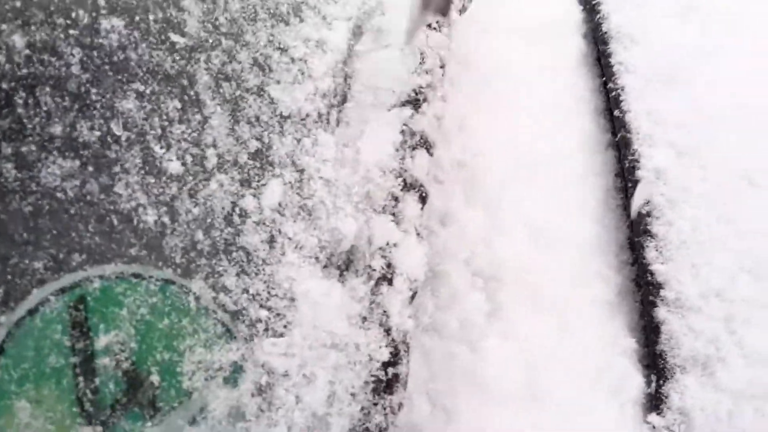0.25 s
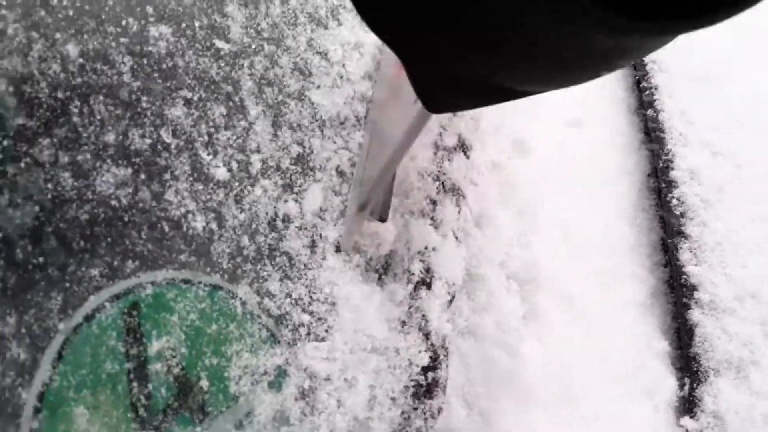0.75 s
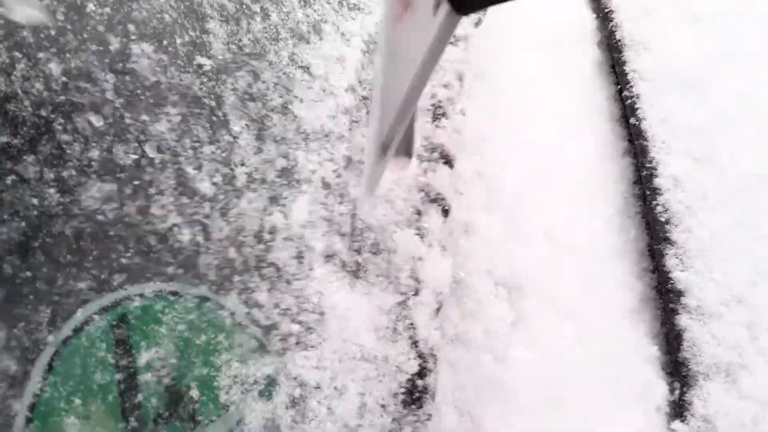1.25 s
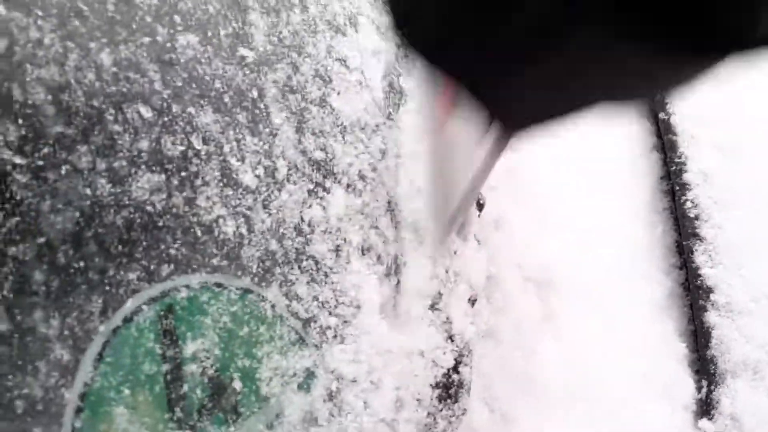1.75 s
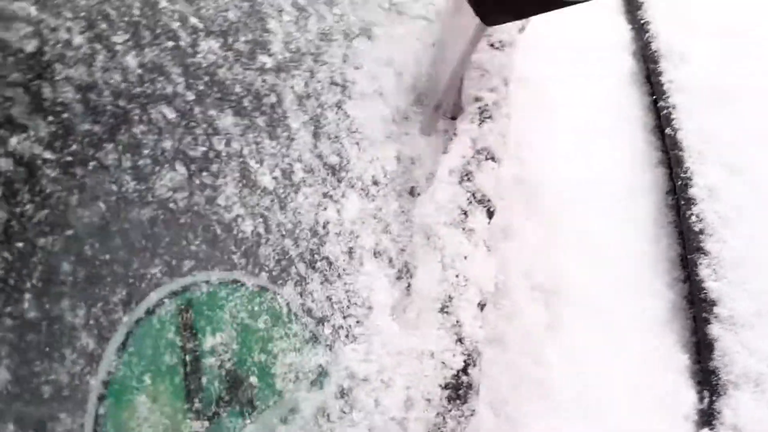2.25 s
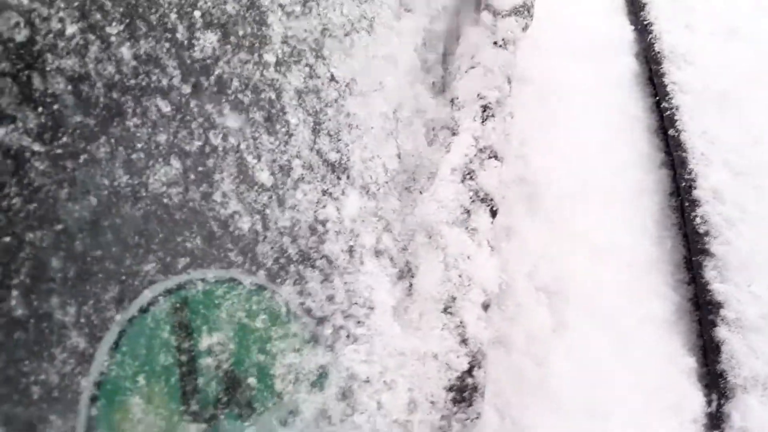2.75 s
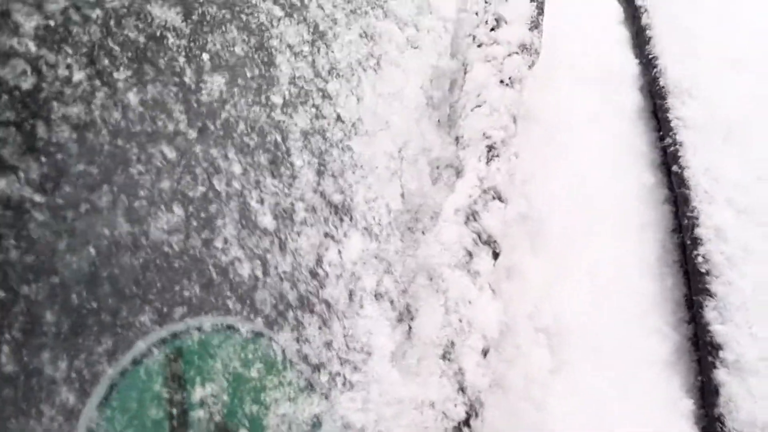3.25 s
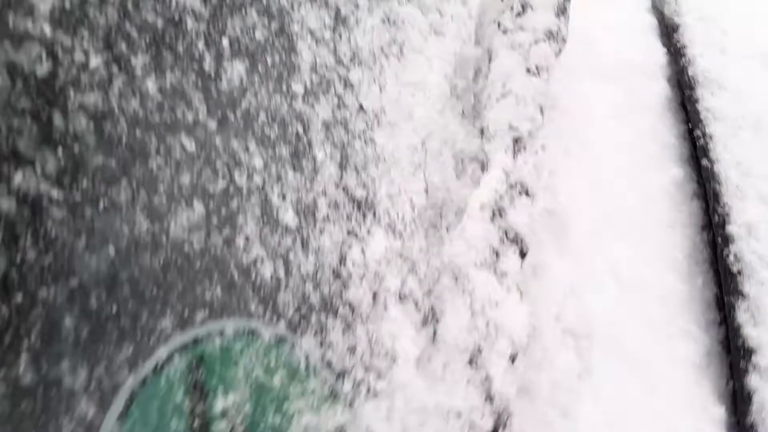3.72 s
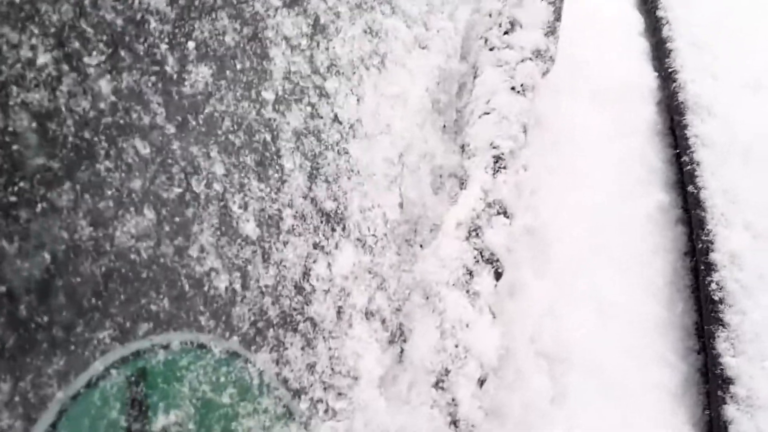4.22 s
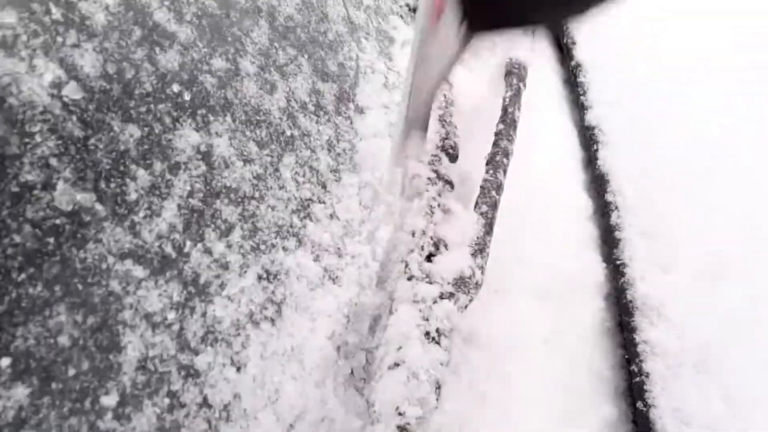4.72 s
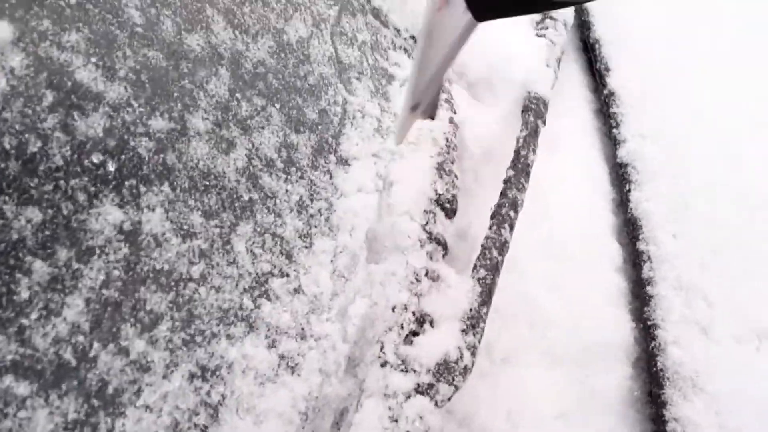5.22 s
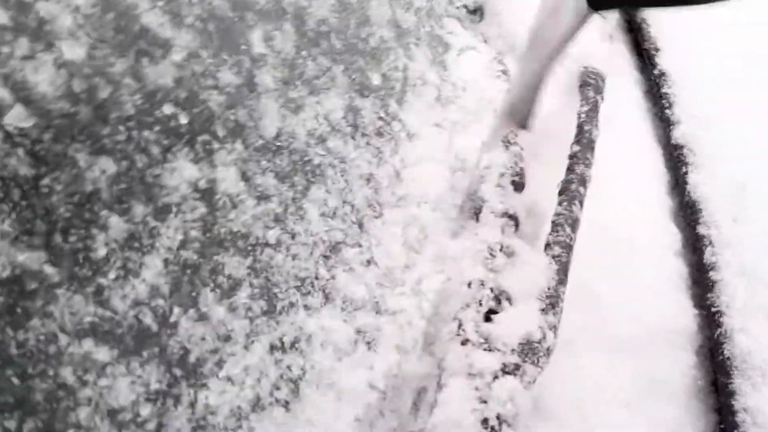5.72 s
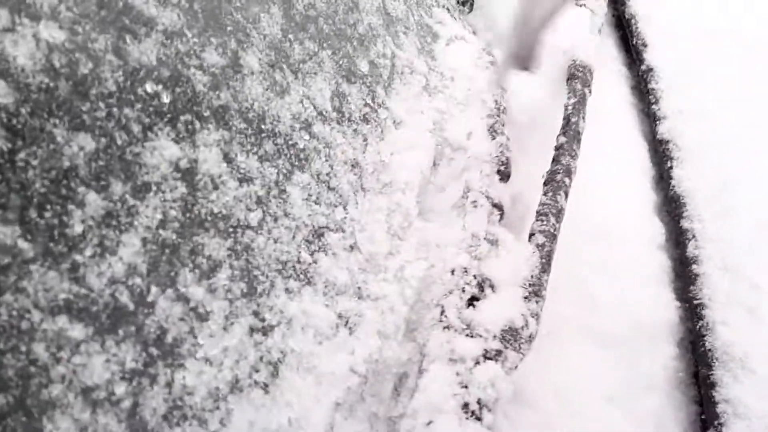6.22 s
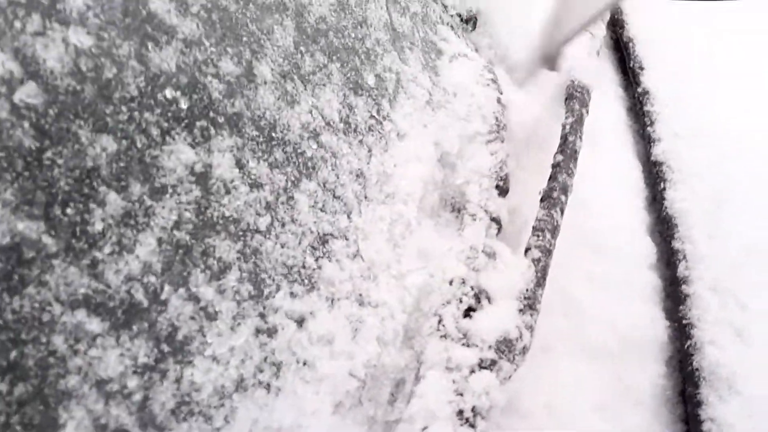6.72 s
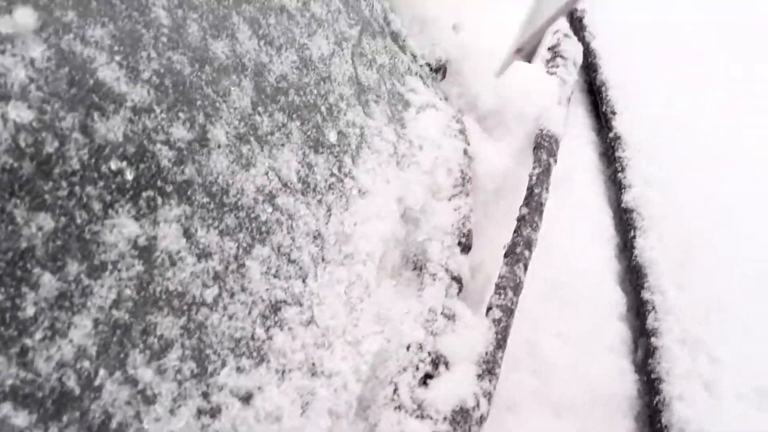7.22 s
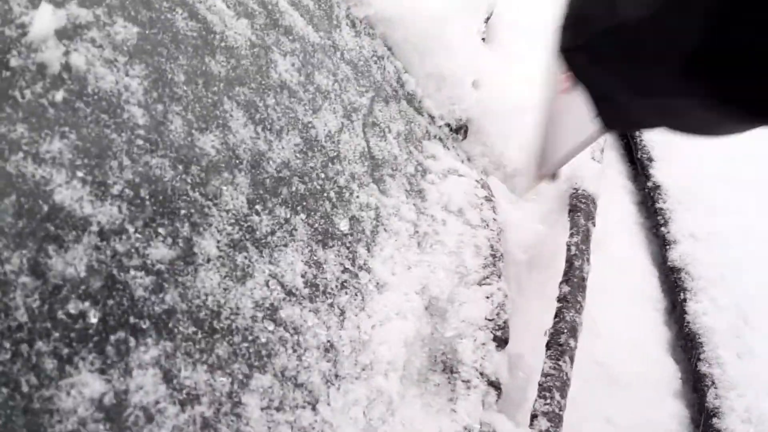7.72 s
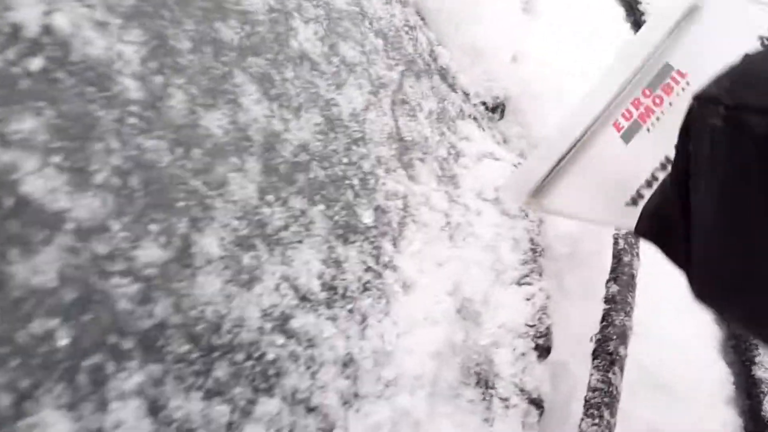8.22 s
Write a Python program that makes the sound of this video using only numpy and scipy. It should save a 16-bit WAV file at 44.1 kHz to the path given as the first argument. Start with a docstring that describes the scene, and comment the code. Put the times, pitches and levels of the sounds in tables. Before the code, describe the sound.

Close, brisk ice scraping on a car windshield: bright brittle crunches, low hollow pane thumps and soft snowy fizz between strokes, outdoors.

```python
"""Faint steady outdoor air lies under everything, with a second soft noise that swells and sinks.
Soon a plastic scraper chops ice off a windshield, three to four blows a second. Each blow pushes on the pane,
which thumps and rings in its low modes (ringing tones), while ice breaks in a burst of tiny bright clicks
and a few flakes snap off; then crumbs skitter away. About a tenth of a second after each blow, the blade
drags back through loose snow with a soft fizz. At the end the scraper is turned over in the snow."""
import sys
import numpy as np
from scipy import signal
from scipy.fft import rfft, irfft
from scipy.io import wavfile

SR = 44100
rng = np.random.default_rng(int(sys.argv[2]) if len(sys.argv) > 2 else 0)


def generate_wav(signal):
    """Clip the signal to [-1, 1] and save it as 16-bit WAV at the path in sys.argv[1]."""
    frames = np.transpose(np.atleast_2d(signal))
    scaled = np.clip(frames, -1, 1) * 32767
    pcm = np.round(scaled).astype(np.int16)
    wavfile.write(sys.argv[1], SR, pcm)


N = 373527


def amp(db):
    """Turns decibels into a plain multiplier."""
    return 10 ** (np.asarray(db) / 20)


def read(points, hz):
    """Reads a table between its points at hz, on a log-frequency axis."""
    f, value = np.transpose(points)
    return np.interp(np.log(hz + 1), np.log(f), value)


def at(points, s):
    """Reads a curve over time at s seconds, in straight lines between its points."""
    return np.interp(s, *np.transpose(points))


def add(mix, s, sound):
    """Lays a sound into the mix at time s and cuts off what runs past the end."""
    start = max(round(s * SR), 0)
    part = mix[:, start:][:, :sound.shape[1]]
    part += sound[:, :part.shape[1]]


def levelled(x, db, seconds):
    """Scales x so that its energy, spread over the given seconds, has the level db."""
    spread_power = np.mean(x ** 2) * x.shape[-1] / (seconds * SR)
    return x * amp(db) / np.sqrt(spread_power + 1e-20)


def coloured(x, points, size=4096):
    """Filters x to the given spectrum without any sound before its cause (minimum phase)."""
    hz = abs(np.fft.fftfreq(size, 1 / SR))
    log_gain = np.log(amp(read(points, hz)))
    response = np.exp(np.conj(signal.hilbert(log_gain)))
    taps = np.fft.ifft(response).real[:size // 2]
    return signal.fftconvolve(x, taps[None], axes=1)[:, :x.shape[1]]


LAG = 8  # the pane's sound reaches the right microphone later (samples)


def from_pane(x):
    """A single sound from the glass, reaching the left microphone first and the right one later."""
    late = np.pad(x, (LAG, 0))[:len(x)]
    return np.array([x, late])


def fractures(t, length, per_s, spread_db, fade):
    """Breaking ice clicks at random times in very uneven sizes; after length the clicks get weaker."""
    size_db = spread_db * np.minimum(rng.exponential(1, len(t)), 3)
    sizes = amp(size_db) * rng.choice([-1, 1], len(t))
    happens = rng.random(len(t)) < per_s / SR
    return sizes * happens * np.exp(-np.maximum(t - length, 0) / fade)


def scattered(clicks, burst, tail_db, t60, alike):
    """Each click is a tiny noise burst, later on the right, with quick echoes off glass and bonnet."""
    t = np.arange(SR // 6) / SR
    noise, alike = rng.standard_normal((3, len(t))), np.clip(alike, 0, 1)
    # alike: how much of the burst both ears share
    both_ears = np.sqrt(alike) * noise[2] + np.sqrt(1 - alike) * noise[:2]
    direct = levelled(both_ears * np.exp(-t / burst), 0, 0.94)
    direct[1] = np.roll(direct[1], rng.integers(2, LAG + 2))  # the path changes with the place of the blade
    fading = np.exp(-np.log(1000) * t / t60)  # falls by 60 dB in t60
    echoes = levelled(rng.standard_normal((2, len(t))) * fading, tail_db, 0.3)
    return signal.fftconvolve(clicks[None], direct + echoes, axes=1)[:, :len(clicks)]


# colour of the steady outdoor air: (f/Hz, gain/dB)
AIR = [(15, -51.5), (25, -21), (84, 1.5), (261, -6), (352, -9), (691, -24), (880, -39), (955, -54),
       (1590, -36.5), (2200, -35.5), (3680, -45.5), (9210, -51), (10300, -41), (14200, -48), (15800, -63.5)]
# colour of the second soft noise: (f/Hz, gain/dB)
SWELL = [(30, 9), (110, 18.5), (220, 12), (500, 3), (1000, -10.5), (1700, -17), (2400, -12), (3400, -25),
         (7000, -39), (9000, -34.5), (10200, -17.5), (11200, -24), (13500, -10), (14600, -22.5),
         (15300, -40)]
# how the second soft noise swells and sinks: (t/s, level/dB)
SWELL_DB = [(0, -64.5), (2, -76), (3, -58.5), (3.6, -56.5), (4.1, -47), (4.7, -50), (5.2, -49.5),
            (5.7, -69.5), (6.5, -61.5), (7.1, -69.5), (7.7, -64.5), (8.47, -83)]


def background():
    """Outdoor air is steady coloured noise; a second soft noise swells and sinks over it."""
    t, noise = np.arange(N) / SR, rng.standard_normal((2, 3, N))
    # the bass is alike in both ears, the rest differs
    bass = coloured(noise[:, 2], [(150, 0.5), (600, -2), (2000, -13.0)])
    apart = [(150, -6), (600, -2.5), (2000, -2)]
    air = coloured(from_pane(bass[0]) + coloured(noise[0, :2], apart), AIR)
    swell = coloured(from_pane(bass[1]) + coloured(noise[1, :2], apart), SWELL)
    return levelled(air, -61.0, N / SR) + levelled(swell, 0, N / SR) * amp(at(SWELL_DB, t))


# how long the echoes from around take to fall by 60 dB: (f/Hz, fade time/s)
YARD = [(100, .9), (400, 0.37), (1500, 0.75), (5000, 0.18), (14000, 0.44)]


def yard(x):
    """The surroundings echo faintly: noise that fades at its own speed at each pitch smears the sound."""
    hz, t, z = signal.stft(rng.standard_normal((2, SR)), SR, nperseg=256)
    fading = np.exp(-np.log(1000) * t / read(YARD, hz)[:, None])
    build_up = 1 - np.exp(-t / 0.0075)
    tail = signal.istft(z * fading * build_up, SR, nperseg=256)[1]
    return signal.fftconvolve(x, tail / np.linalg.norm(tail[0]), axes=1)[:, :N]


# dull handling rumbles: (t/s, length/s, level/dB)
RUMBLES = [(4.109, 0.23, -56.5), (4.744, 0.066, -54), (6.984, 0.15, -49), (8.395, 0.15, -54.5)]
# colour of the rumbles: (f/Hz, gain/dB)
RUMBLE = [(30, -21), (80, -20), (110, 21), (135, 8), (220, -5), (450, -26), (1000, -69)]


def rumbles():
    """Handling makes the pane rumble: bass noise that swells up and down smoothly."""
    out = np.zeros((1, N))
    for s, length, db in RUMBLES:
        swell = np.hanning(round(length * SR))
        noise = coloured(rng.standard_normal((1, SR // 2)), RUMBLE)[:, -len(swell):]
        add(out, s, levelled(noise * swell, db, length))
    return from_pane(out[0])


# colour of a chip's dull tap on the glass: (f/Hz, gain/dB)
TAP = [(200, 2), (600, 7.5), (1000, -1), (1700, -4.5), (2400, -10.5), (3500, -31), (6400, -33),
       (10000, -31.5)]


def chip(snap_db, tap_db, grit_db):
    """One piece of ice breaks: a single click gives a sharp snap, a dull tap on the glass and a spit of grit."""
    click = 1. * (np.arange(SR // 8) == 0)
    snap = coloured(scattered(click, burst=0.0011, tail_db=-9, t60=0.021, alike=.9), CRUNCH)
    tap = coloured(scattered(click, burst=0.0013, tail_db=-6, t60=0.014, alike=0.85), TAP)
    grit = coloured(scattered(click, burst=0.0013, tail_db=-9, t60=0.012, alike=0.84), GRIT)
    return levelled(snap, snap_db, .003) + levelled(tap, tap_db, .015) + levelled(grit, grit_db, .003)


# flakes of each blow: (share of the crushing time, snap against crunch level/dB, tap against force level/dB)
FLAKES = [(.2, 10, -9.5), (.72, 9.5, -8)]
FLAKE_VARY_DB = 2  # spread in the size of the flakes
# pieces that break on their own, after a blow or on the way back, and at 1.761 s a sharp crack as the blade
# bounces back onto the ice: # (t/s, snap level/dB, tap on the glass level/dB, grit level/dB)
CHIPS = [(0.2847, -45, -56, -81), (0.402, -49, -96, -86), (0.937, -39.5, -63.5, -69),
         (1.2651, -39, -64.5, -57.5), (1.4855, -40, -45.5, -74), (1.7612, -34.5, -45.5, -41),
         (2.147, -51, -58, -70), (2.3887, -48, -58, -69), (2.931, -41.5, -64, -72), (3.248, -47, -59, -84),
         (3.5373, -47, -52, -81), (3.8212, -37, -48.5, -64), (4.9829, -47.5, -51.5, -85.5),
         (5.254, -47.5, -50, -81), (5.5409, -57, -59.5, -85), (6.4795, -40.5, -60.5, -70),
         (7.2288, -62, -59.5, -77), (7.5179, -50, -58.5, -74), (8.3104, -52.5, -79, -90),
         (8.418, -71, -76, -93)]


def chips():
    """Flakes snap off during every blow, stray pieces break on their own, and once the bouncing blade cracks
    the ice."""
    out = np.zeros((2, N))
    for s, length, force_db, _, crunch_db in BLOWS:
        grit_db = crunch_db + at(HARD_ICE_DB, s) - 17.5
        for share, snap_db, tap_db in FLAKES:
            size_db = FLAKE_VARY_DB * rng.standard_normal()
            flake = chip(crunch_db + snap_db, force_db + tap_db, grit_db)
            add(out, s + share * length, amp(size_db) * flake)
    for s, *levels in CHIPS:
        add(out, s, chip(*levels))
    return out


# colour of the dull part of the return stroke: (f/Hz, gain/dB)
SCRAPE = [(60, -10), (200, 9), (500, 5), (950, 0), (1400, 1), (2200, -3), (3000, -10), (4300, -15),
          (7500, -27), (12000, -45)]
# colour of its bright fizz: (f/Hz, gain/dB)
FIZZ = [(2000, -46), (4000, -43), (7300, -42), (8500, -32), (10200, -22), (11500, -20), (13000, -7),
        (14300, 0), (14800, -7), (15200, -26), (16500, -50)]
SCRAPE_OVER_FIZZ_DB = -11  # the dull part against the fizz


def drag(length, fizz_db):
    """Snow rubs in dense clicks under the retreating blade, and loose grains of ice crackle in it."""
    t = np.arange(SR // 4) / SR
    press = 1 - np.exp(-t / 0.005)
    snow = press * fractures(t, length, per_s=2000, spread_db=3, fade=.009)
    ice = press * fractures(t, length, per_s=320, spread_db=5, fade=.005)
    scrape = coloured(scattered(ice + .55 * snow, burst=.001, tail_db=-7, t60=.06, alike=.8), SCRAPE)
    fizz = coloured(scattered(ice + .25 * snow, burst=.0009, tail_db=-13, t60=0.11, alike=0.65), FIZZ)
    return levelled(scrape, fizz_db + SCRAPE_OVER_FIZZ_DB, length) + levelled(fizz, fizz_db, length)


# fizz of the loose snow that lies in the way: (t/s, level/dB)
LOOSE_SNOW_DB = [(.24, -62.5), (1.2, -53.5), (1.8, -63.5), (2.15, -57.5), (4.4, -57.5), (4.95, -56.5),
                 (5.9, -67), (6.25, -47), (6.75, -81.5), (7.5, -68), (8.3, -78.5)]
# the scraper is turned over in the snow at the end: (t/s, length/s, fizz level/dB)
TURN_OVER = (8.33, .14, -70)
# delay after the blow, length, and the most that either varies (s)
DRAG_DELAY_S, DRAG_LENGTH_S, DRAG_VARY_S = .093, 0.046, 0.014


def drags():
    """The blade rubs back through the snow after every blow; at last the scraper is turned over."""
    out = np.zeros((2, N))
    chance = rng.uniform(-1, 1, (len(BLOWS), 2))
    for (s, *_), (late, longer) in zip(BLOWS, DRAG_VARY_S * chance):
        start = s + DRAG_DELAY_S + late
        add(out, start, drag(DRAG_LENGTH_S + longer, at(LOOSE_SNOW_DB, start)))
    turn_s, turn_length, turn_db = TURN_OVER
    add(out, turn_s, drag(turn_length, turn_db))
    return out


def ring(t, modes, detune, uneven_db):
    """Pane modes build up and die; chance shifts their pitch and weight, as the blade lands elsewhere."""
    hz, db, t60, build = np.transpose(modes)[:, :, None]
    shift, weight, phase = rng.standard_normal((3, len(modes), 1))
    swing = np.sin(2 * np.pi * hz * (1 + detune * shift) * t + phase)
    build_up = (1 - np.exp(-t / build)) ** 2
    fading = np.exp(-np.log(1000) * t / t60)
    return (amp(db + uneven_db * weight) * build_up * fading * swing).sum(0)[None]


# the first push of the edge bends the glass and is damped at once: (f/Hz, level/dB, 60 dB fade time/s)
PUSH = [(158, -18, 0.22), (271, -2, 0.072), (420.5, -17.5, 0.14)]
# the windshield's low modes: (f/Hz, level/dB, 60 dB fade time/s, build-up/s)
LOW_MODES = [(60.5, -13.5, 0.13, 0.0075), (99.3, -13, 0.33, 0.0059), (126.04, 10.5, 0.15, 0.018)]
# its middle modes: (f/Hz, level/dB, 60 dB fade time/s, build-up/s)
MIDDLE_MODES = [(177.9, -8.5, 0.31, 0.0029), (215.35, 8, 0.2, 0.0053), (240.6, 6, 0.068, 0.0022)]
# its upper modes: (f/Hz, level/dB, 60 dB fade time/s, build-up/s)
UPPER_MODES = [(284.1, -2, 0.16, 0.0073), (341.4, 1, 0.13, 0.0024), (429.5, -2.5, 0.08, 0.00028),
               (493, -4, 0.059, 0.0035), (538, -8, 0.079, 0.0014), (609.7, -11, 0.087, 0.00074),
               (648, -7.5, 0.062, 0.0021), (742, -11, 0.075, 0.00012), (835, -18, 0.082, 0.00034)]
# brighter mid-glass, duller near the rim: (t/s, upper modes up and middle modes down/dB)
PANE_TILT_DB = [(.15, 0), (2.8, 2), (5.3, 1), (6.5, 0), (7.7, -4)]
# a short round thump, as from an echo inside the car: pitch (Hz), delay after the pane gives, length (s)
RETURN_HZ, RETURN_DELAY, RETURN_LENGTH = 208.9, 0.01756, 0.014
# the pane gives once this share of the crushing is over
GIVE_SHARE = 0.2596
# harder blows ring the upper modes more: dB per dB above a usual blow's force (dB)
HARDER_BRIGHTER, USUAL_FORCE_DB = 0.094, -36


def pane():
    """The windshield bends under each blow, then gives, and its modes swell and ring."""
    out, t = np.zeros((1, N)), np.arange(SR // 2) / SR
    push = sum(amp(db - 60 * t / t60) * np.sin(2 * np.pi * hz * t) for hz, db, t60 in PUSH)[None]
    bump = np.sin(np.pi * np.minimum(t / RETURN_LENGTH, 1)) ** 2
    back = (bump * np.sin(2 * np.pi * RETURN_HZ * t))[None]
    for s, length, force_db, bass_db, _ in BLOWS:
        gives = s + GIVE_SHARE * length
        bright_db = HARDER_BRIGHTER * (force_db - USUAL_FORCE_DB) + at(PANE_TILT_DB, s)
        low = ring(t, LOW_MODES, detune=0.0034, uneven_db=0.0)
        middle = ring(t, MIDDLE_MODES, detune=0.012, uneven_db=4.5)
        upper = ring(t, UPPER_MODES, detune=0.02, uneven_db=3.0)
        add(out, s, levelled(push, force_db - 10.5, 0.13))
        add(out, gives + RETURN_DELAY, levelled(back, force_db - 3.0, 0.073))
        add(out, gives, levelled(low, force_db + bass_db + 1.3, 0.067))
        add(out, gives, levelled(middle, force_db - bright_db - .8, 0.14))
        add(out, gives, levelled(upper, force_db + bright_db - 6.0, 0.23))
    return from_pane(out[0])


# modes of the plastic blade: (f/Hz, level/dB, 60 dB fade time/s)
BLADE_MODES = [(3300, 0, .05), (4200, 0, .07), (4800, -1, .06), (5500, -4, .05), (6450, -2, .08)]


def blade_ring(clicks):
    """Clicks ring the plastic blade; grip and angle change its modes' pitch and weight from blow to blow."""
    t = np.arange(len(clicks)) / SR
    hz, db, t60 = np.transpose(BLADE_MODES)[:, :, None]
    shift, weight = rng.standard_normal((2, len(hz), 1))
    swing = np.sin(2 * np.pi * hz * (1 + .025 * shift) * t)
    modes = amp(db + 5 * weight - 60 * t / t60) * swing
    return from_pane(signal.fftconvolve(clicks, modes.sum(0))[:len(t)])


# crumbs after each blow: count per s, fade (s), level against the blow's crunch column (dB)
SKITTER_PER_S, SKITTER_FADE_S, SKITTER_DB = 140, .022, -23.5


def skitter(t, db):
    """Loose crumbs tick over the glass, dying away."""
    ticks = fractures(t, 0, per_s=SKITTER_PER_S, spread_db=4, fade=SKITTER_FADE_S)
    sound = coloured(scattered(ticks, burst=0.0011, tail_db=-10.5, t60=0.042, alike=0.35), CRUNCH)
    return levelled(sound, db, 0.064)


# one row a blow; each layer adds its own offset to these levels:
# (t/s, crushing time/s, force on the pane level/dB, bass against force/dB, crunch of the ice level/dB)
BLOWS = [(0.152, 0.013, -39.5, -2.5, -36.5), (0.484, 0.019, -45.5, -3.5, -39.5),
         (0.792, 0.016, -37, -5, -40.5), (1.125, 0.02, -39.0, -2.5, -34.5), (1.44, 0.018, -40.5, -12, -43),
         (1.736, 0.0095, -45, -7, -46.0), (2.034, 0.017, -39.5, -10.5, -43), (2.317, 0.023, -42, 5.5, -34),
         (2.6, 0.029, -39.5, -2.5, -39), (2.871, 0.014, -38.5, -1.5, -43.5),
         (3.148, 0.0078, -37.5, -13, -40), (3.433, 0.0094, -34.5, 0.5, -41.5),
         (3.715, 0.012, -29.5, -3, -35), (4.016, 0.008, -29.5, 3, -37), (4.32, 0.0078, -28.5, -5.5, -38),
         (4.583, 0.013, -33.5, 4.5, -32), (4.859, 0.013, -34, 0, -38), (5.12, 0.0095, -31.5, -3.5, -40),
         (5.409, 0.0051, -35, -4.5, -46.5), (5.646, 0.023, -36.5, -1.5, -35.5),
         (5.892, 0.0088, -36.5, -2.5, -43), (6.133, 0.017, -40.5, 5, -41), (6.389, 0.014, -40, -2, -37),
         (6.649, 0.011, -37, -1, -41), (6.891, 0.0094, -38, -1, -44.5), (7.141, 0.0092, -36, -8.5, -46.5),
         (7.401, 0.0063, -44, 2.5, -41.5), (7.693, 0.0058, -41, -12.5, -44),
         (8.217, 0.0059, -58.5, -4, -67)]
# colour of the ice crunching in the air: (f/Hz, gain/dB)
CRUNCH = [(1500, -23.5), (3300, -25), (6400, -53), (7300, -49.5), (8500, -31.5), (10200, -12.5),
          (11300, -13), (13000, 3), (14400, 8), (14850, -10), (15200, -27), (16500, -28)]
# colour of the crack against the glass: (f/Hz, gain/dB)
CRACK = [(200, 5), (600, 4), (900, 4), (1050, 0), (1400, 3), (1750, -8.5), (2300, -4), (3300, -30.5),
         (4500, -20), (6400, -37), (7200, -42), (9000, -44.5), (12000, -44.5)]
# colour of the ground-up grit: (f/Hz, gain/dB)
GRIT = [(1200, -27.5), (2500, -1), (4000, -1.5), (5200, -10.5), (6400, -2), (7300, -22), (9000, 8),
        (12000, -17)]
# hard ice cracks louder and sheds more grit than soft ice: (t/s, change/dB)
HARD_ICE_DB = [(.15, -2), (1.1, 2.5), (2, -1), (2.55, 5.5), (3.5, 1.5), (4.5, 0), (5.2, -4), (6.2, 2.5),
               (6.9, -1), (7.7, 1)]
DIG_IN_S = 0.0026  # time over which the edge digs in and the crushing builds up
SPOT_COLOUR_DB = 2.2  # every blow lands on another spot, which colours its crack
# the crack lies between force and crunch: share of the force, offset (dB)
CRACK_FORCE_SHARE, CRACK_DB = .6, -13


def chops():
    """The edge crushes ice: crunch in the air, crack on the glass, grit, a ringing blade and crumbs."""
    out, t = np.zeros((2, N)), np.arange(SR // 5) / SR
    dig = 1 - np.exp(-t / DIG_IN_S)
    for s, length, force_db, _, crunch_db in BLOWS:
        clicks = dig * fractures(t, length, per_s=1100, spread_db=5.5, fade=.003)
        clicks[0] += 1.3  # first contact
        crumbs = dig * fractures(t, length, per_s=1500, spread_db=4, fade=.009)
        spot = [(hz, db + SPOT_COLOUR_DB * rng.standard_normal()) for hz, db in CRACK]
        crack = coloured(scattered(clicks + .5 * crumbs, burst=0.0011, tail_db=-5, t60=0.071, alike=0.66), spot)
        crunch = coloured(scattered(clicks, burst=0.0005, tail_db=-9, t60=0.06, alike=.5), CRUNCH)
        grit = coloured(scattered(crumbs, burst=.0006, tail_db=-10, t60=.055, alike=.75), GRIT)
        between_db = CRACK_FORCE_SHARE * force_db + (1 - CRACK_FORCE_SHARE) * crunch_db
        crack_db = CRACK_DB + between_db + at(HARD_ICE_DB, s)
        grit_db = crack_db - 15.5 + 18 * np.log10(length / 0.022)  # a long bite grinds more grit
        ring_db = grit_db - 8.5 + 12 * np.log10(length / 0.021)  # a long bite makes the blade sing more
        add(out, s, levelled(crack, crack_db, .1))
        add(out, s, levelled(crunch, crunch_db - 3, .1))
        add(out, s, levelled(grit, grit_db, .1))
        add(out, s, levelled(blade_ring(crumbs), ring_db, .1))
        add(out, s + length, skitter(t, crunch_db + SKITTER_DB))
    return out


# where the blade works and how fine the ice is there:
# (t/s, treble left over right/dB, top treble over lower treble/dB)
BLADE = [(.15, -2.5, 3), (1.44, -1.5, 3), (2.03, -3.5, -3), (2.87, -2.5, -8), (4.02, 3, -2),
         (4.75, -.5, -1), (5.2, 2, 6), (6.2, 0, 5), (7.69, 3.5, 5)]
# which treble counts as top treble: (f/Hz, share from 0 to 1)
SHEEN = [(12600, 0), (14300, 0.94)]


def aimed(ice):
    """The crunch turns finer or coarser and its treble beams left or right as the blade moves on."""
    hz, t = np.fft.rfftfreq(N, 1 / SR), np.arange(N) / SR
    s, pan_db, sheen_db = np.transpose(BLADE)
    pan, sheen = amp(np.interp(t, s, pan_db) / 2), amp(np.interp(t, s, sheen_db) / 2)
    spectrum = rfft(ice)
    treble = irfft(spectrum * (hz > 7300), N)
    top = irfft(spectrum * read(SHEEN, hz), N)
    # the square roots even out the gains, so that one side's rise is the other's fall
    tilted = (top * sheen + (treble - top) / sheen) / np.sqrt((sheen ** 2 + sheen ** -2) / 2)
    panned = tilted * np.array([pan, 1 / pan]) / np.sqrt((pan ** 2 + pan ** -2) / 2)
    return ice - treble + panned


# how much more the left microphone gets: (f/Hz, left over right/dB)
BALANCE_DB = [(60, 0.5), (200, 1.54), (500, 4), (1000, 4.5), (2000, 5), (4000, 0.5), (8000, 1.5),
              (14000, 3.5)]


def facing_left(x):
    """The left microphone faces the work and gets more of it, above all of its midrange."""
    side = amp(read(BALANCE_DB, np.fft.rfftfreq(N, 1 / SR)) / 2)
    gains = np.array([side, 1 / side]) / np.sqrt((side ** 2 + side ** -2) / 2)
    return irfft(rfft(x) * gains, N)


def scene():
    """Pane and ice sound up close, with faint echoes and the background a little stronger on the left."""
    thumps = pane()
    ice = aimed(chops() + drags() + chips())
    echoes = amp(-23.5) * from_pane(yard(thumps)[0]) + amp(-27.5) * yard(ice)
    far = (echoes + background()) * amp([[.6], [-.6]])
    return facing_left(thumps + ice + rumbles()) + far


EDGE_HZ = 16300  # upper end of the treble


def record(dry):
    """The recorder's band limit: a low-pass filter takes away the treble above the edge."""
    low_pass = signal.firwin(255, EDGE_HZ, window=("kaiser", 9), fs=SR)
    return signal.oaconvolve(dry, low_pass[None], "same")


dry = scene()
out = record(dry)
generate_wav(out)
```